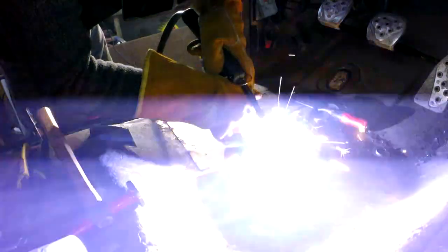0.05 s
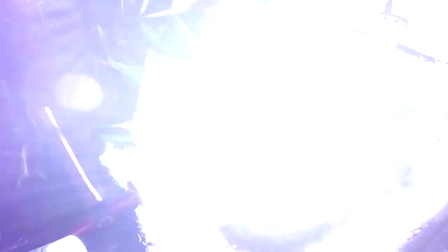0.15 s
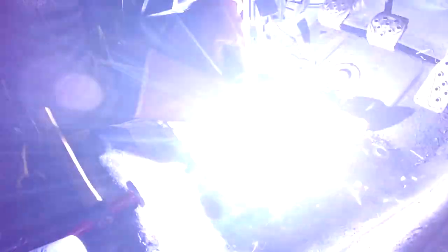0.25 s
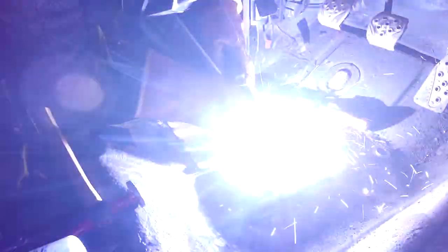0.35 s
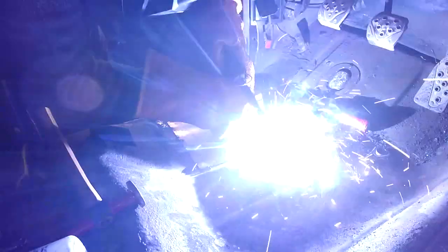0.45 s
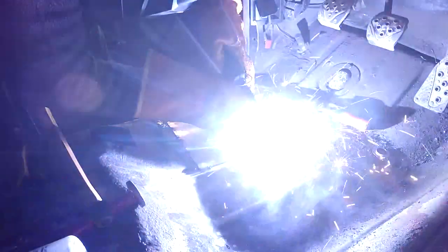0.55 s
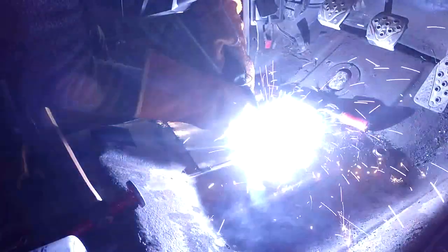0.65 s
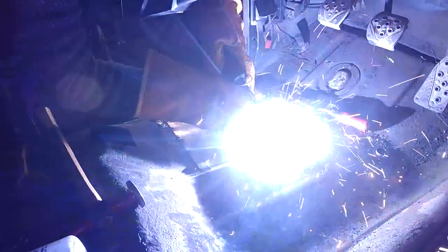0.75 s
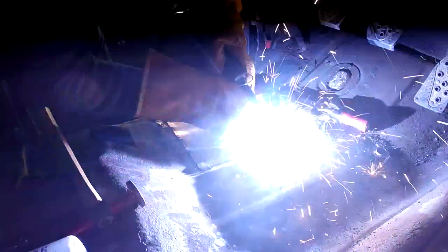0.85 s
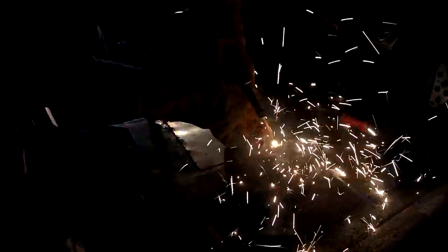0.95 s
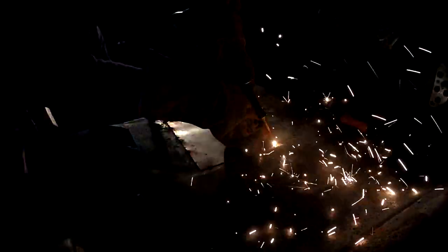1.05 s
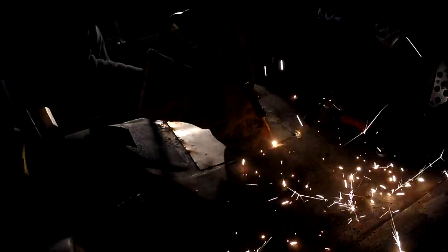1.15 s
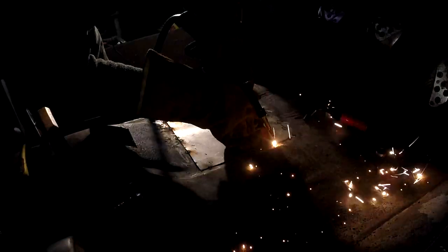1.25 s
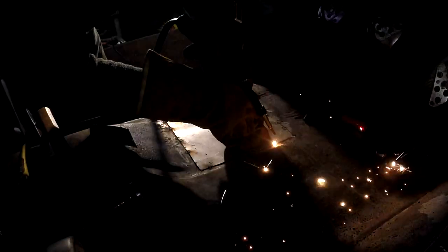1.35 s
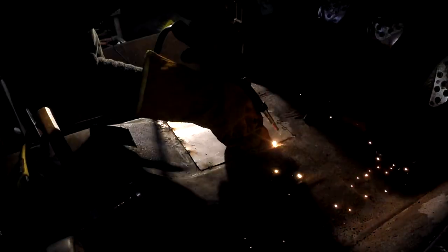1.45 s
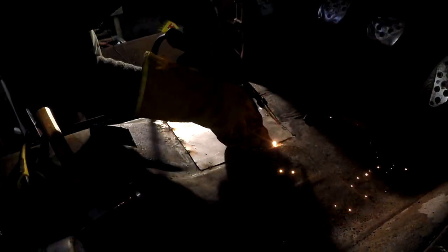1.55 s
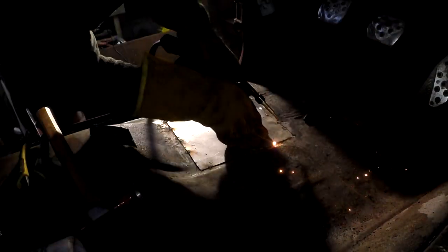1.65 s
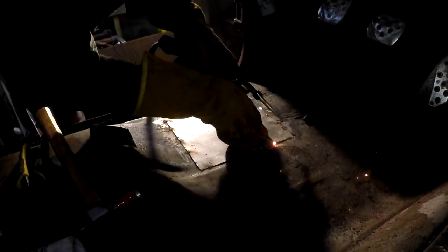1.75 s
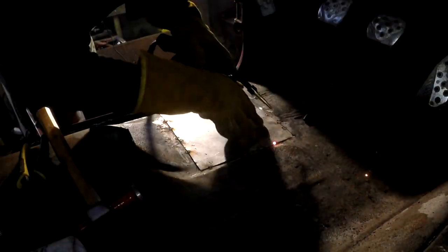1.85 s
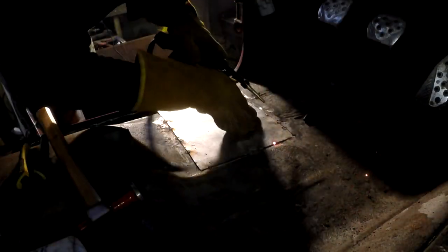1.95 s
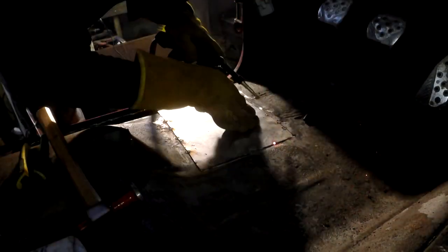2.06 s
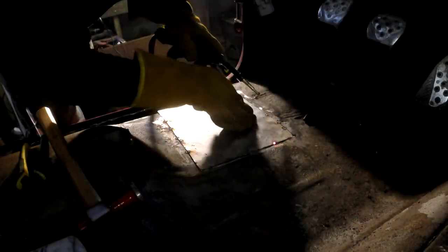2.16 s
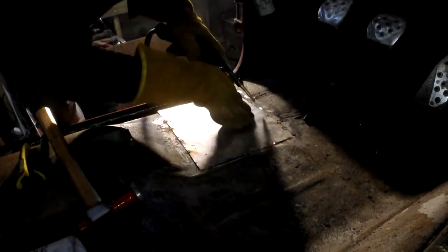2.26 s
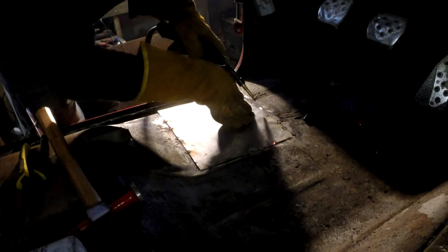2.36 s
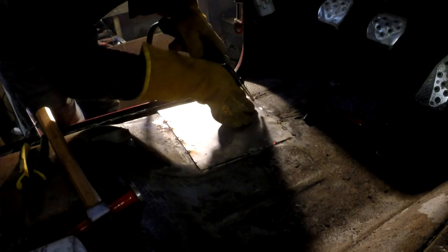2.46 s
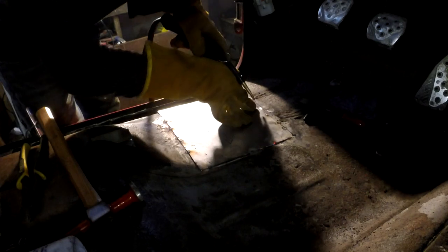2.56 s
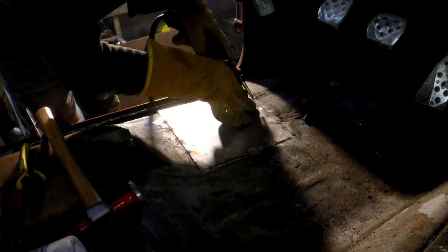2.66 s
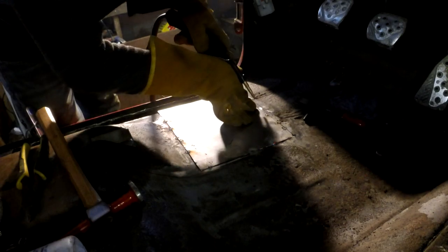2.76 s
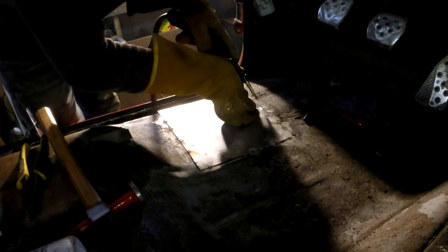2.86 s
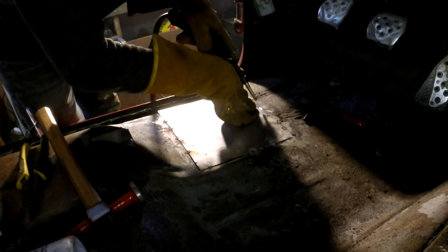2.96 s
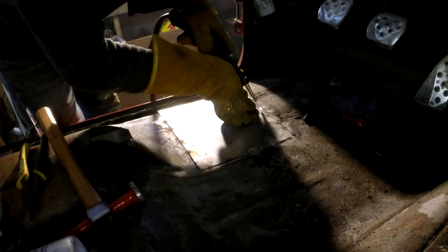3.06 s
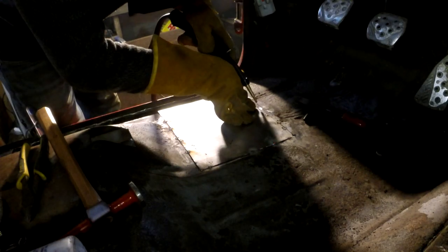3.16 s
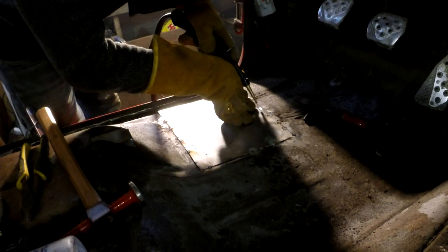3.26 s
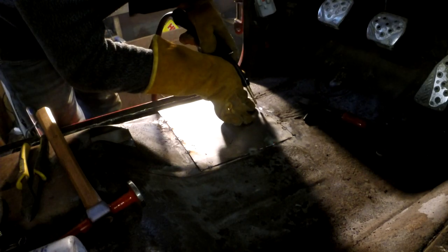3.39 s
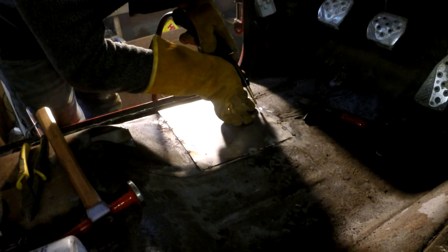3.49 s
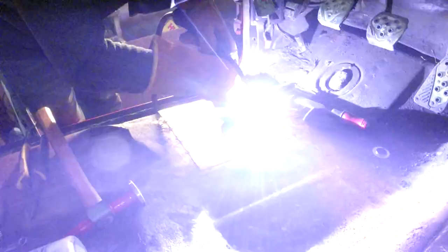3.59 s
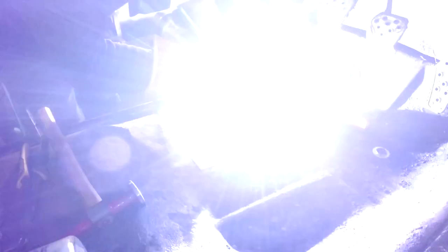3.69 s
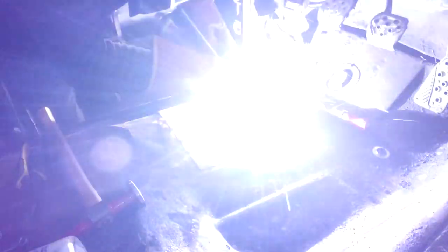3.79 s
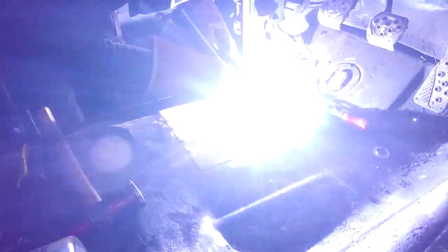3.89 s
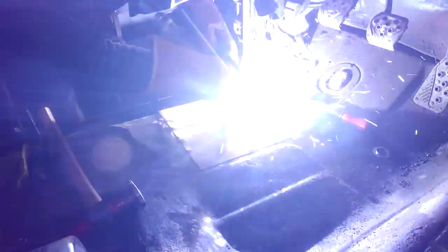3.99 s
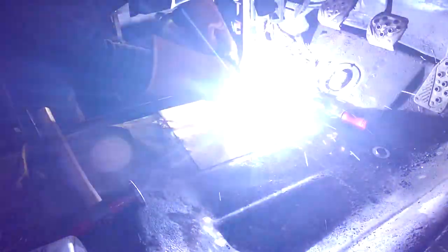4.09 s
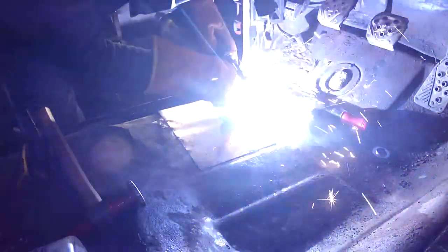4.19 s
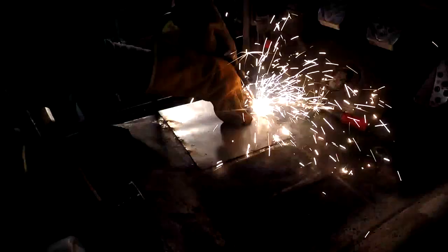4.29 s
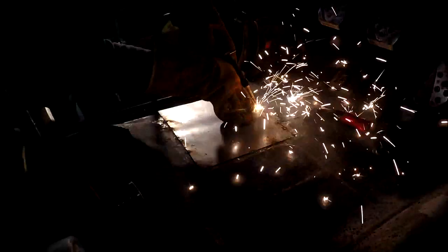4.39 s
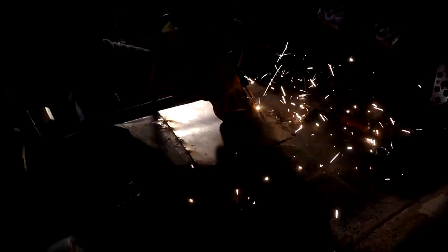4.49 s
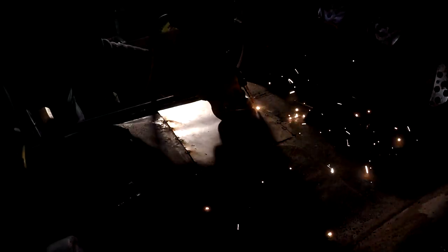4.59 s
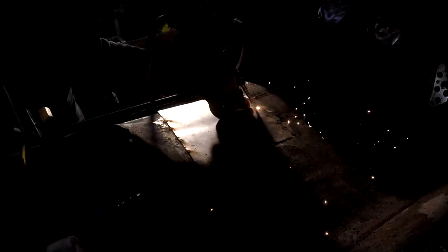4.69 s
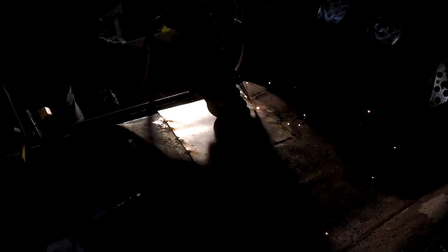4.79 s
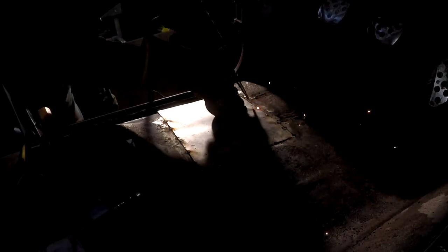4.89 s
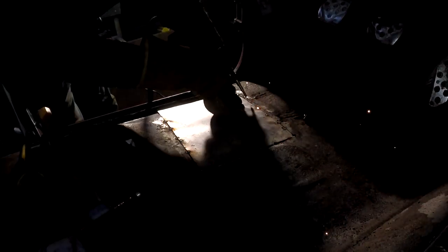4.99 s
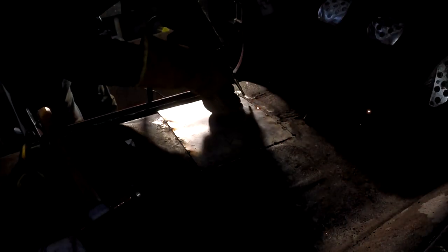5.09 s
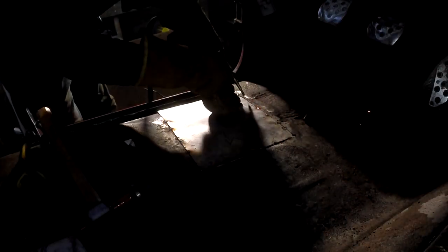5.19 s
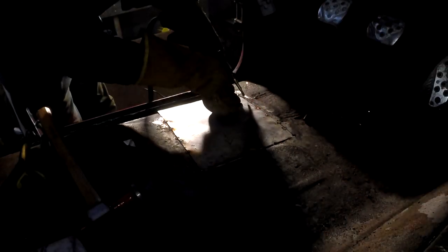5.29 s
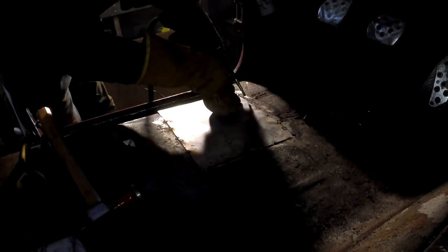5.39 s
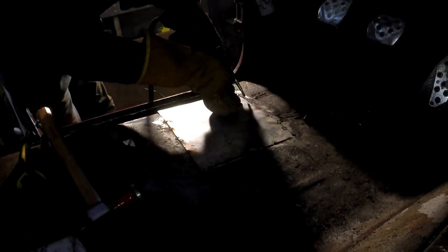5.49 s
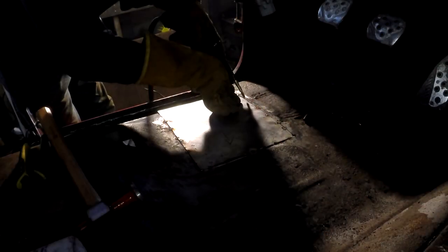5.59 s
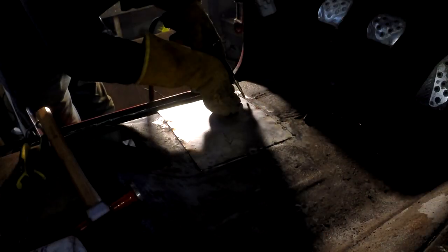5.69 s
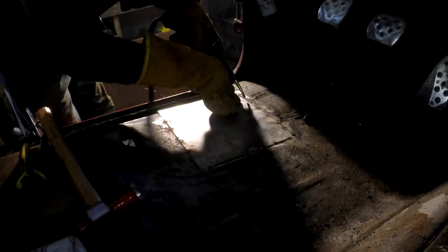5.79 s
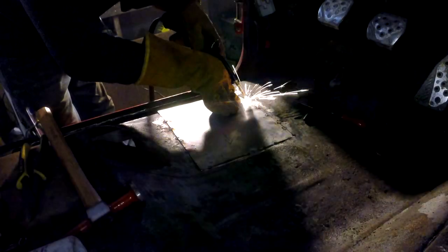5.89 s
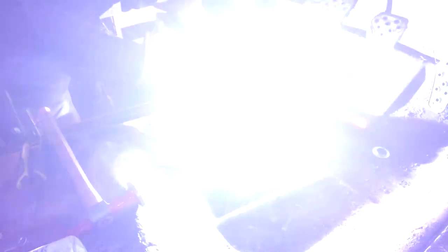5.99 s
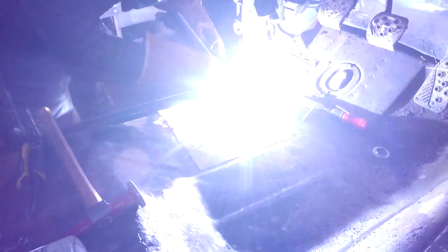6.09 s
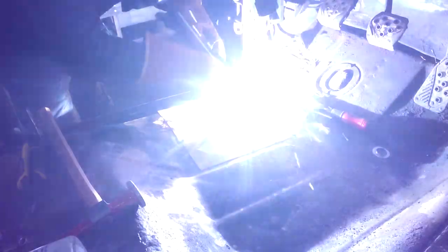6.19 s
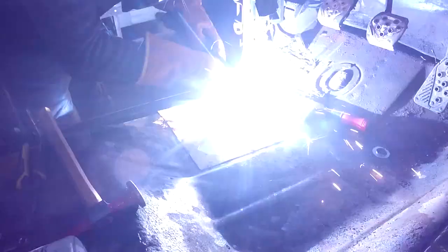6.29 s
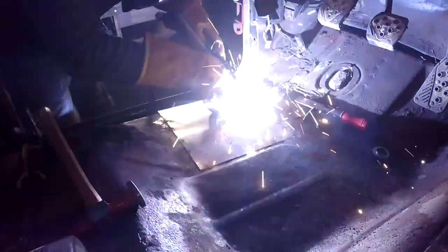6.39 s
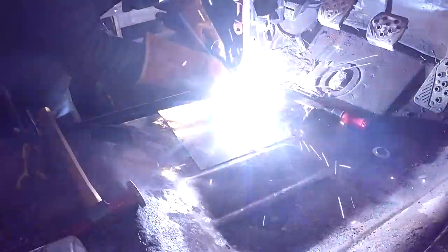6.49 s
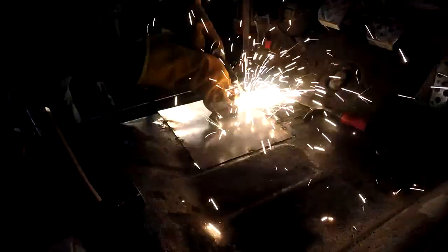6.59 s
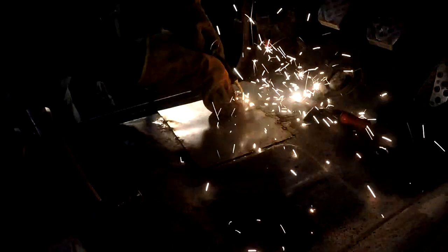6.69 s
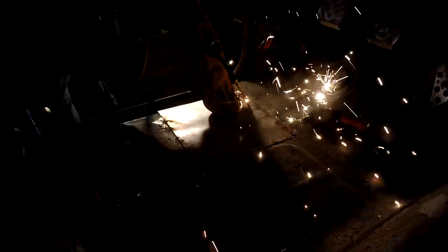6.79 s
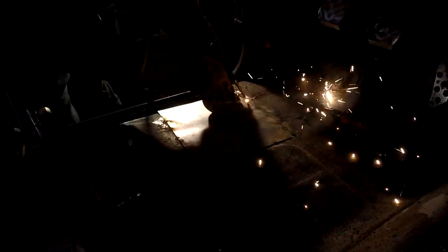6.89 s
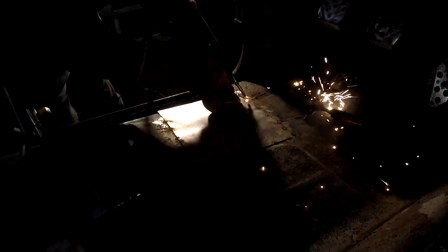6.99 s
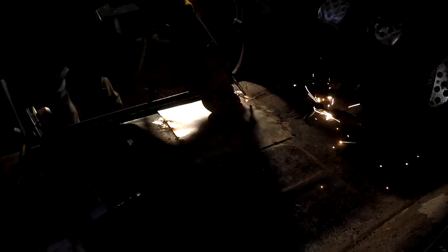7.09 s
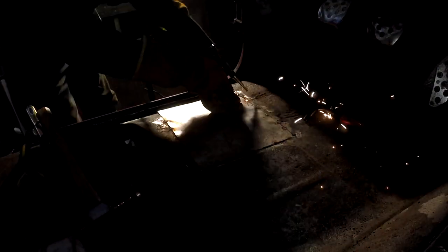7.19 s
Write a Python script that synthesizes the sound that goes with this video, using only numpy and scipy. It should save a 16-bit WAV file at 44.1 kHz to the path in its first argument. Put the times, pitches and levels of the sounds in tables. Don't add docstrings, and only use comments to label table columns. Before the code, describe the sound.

Close, loud and mono: three brief bursts of electric welding, each a ragged string of hard cracks with mains-rate sizzle and a short metallic ring from surrounding panels. A low thud and a tiny gas puff come just before the second and third. The gaps are far quieter, with distant motor hum, airy workshop noise, leather rubbing on steel, muffled torch knocks and a few bright ticks of landing sparks.

```python
import sys
import numpy as np
from scipy import signal
from scipy.fft import rfft, irfft
from scipy.io import wavfile
from scipy.ndimage import uniform_filter1d

SR = 44100
rng = np.random.default_rng(int(sys.argv[2]) if len(sys.argv) > 2 else 0)


def gain_from_db(level_db):
    decades = np.asarray(level_db, float) / 20
    return 10 ** decades


def materialize(psi):
    bounded = np.clip(np.atleast_2d(psi).T, -1, 1)
    quanta = np.round(bounded * 32767).astype(np.int16)
    wavfile.write(sys.argv[1], SR, quanta)


N = 319725
t = np.arange(N) / SR

# start_s, crack_db, shake_db (shake of the hollow)
FIRST_SNAPS = [(.015, -8, -18), (.0348, -4, -11.5), (.0404, -2, 1), (.0548, -12, -6), (.0884, -9, 1),
               (.0909, -3, -7.5), (.1233, -20, -13), (.1719, -9, -8.5), (.2519, -8, -1), (.2555, -9, -2.5),
               (.273, -6, -6), (.2891, -9, -6.5), (.3452, -11, -7), (.4754, -8, -11), (.549, -6, -4),
               (.592, -5, -3), (.6017, -3, -4.5), (.6159, -4, -5.5), (.6228, -11, -6), (.6313, -6, -6),
               (.6553, -9, -7), (.6822, -11, -7.5), (.7317, -8, -8), (.8083, -11, -5), (.8969, -13, -4),
               (.9152, -7, -2.5), (.9243, -16, -3), (.9737, -5, -3), (1.0076, -11, -6.5), (1.0481, -7, -3)]
SECOND_SNAPS = [(3.7795, -4, 0), (3.7906, -2, .5), (3.798, -9, -7), (3.8073, -4, 1), (3.8155, -8, -6),
                (3.8264, -9, -11), (3.8331, -4, -9), (3.8403, -4, -.5), (3.8478, -9, -9), (3.8594, -21, -6),
                (3.8759, -17, -12), (3.8993, -6, -5), (3.9248, -4, -2), (3.9643, -14, -9), (3.9998, -4, -4),
                (4.0356, -6, -4), (4.0483, -13, -9), (4.0678, -14, -11), (4.0761, -13, -6), (4.142, -5, -1),
                (4.1914, -14, -11), (4.2306, -15, -10), (4.319, -5, -3), (4.3327, -9, -10),
                (4.3498, -15, -6), (4.3655, -11, -5), (4.3931, -4, -2), (4.4271, -14, -4.5),
                (4.4335, -5, -2.5), (4.4567, -11, -9)]
THIRD_SNAPS = [(6.0634, -6, -1), (6.1042, -22, -13), (6.1275, 0, 3), (6.2027, -21, -9), (6.2122, -13, -6.5),
               (6.2182, -12, -2), (6.2518, -19, -10), (6.3015, -14, -12), (6.3099, -12, -6),
               (6.3249, -3, -3), (6.3345, -5, -1), (6.343, -7, -5), (6.3606, -16, -5), (6.3664, -9, -14),
               (6.3772, -12, -5.5), (6.4104, -8, -5), (6.427, -11, -5), (6.4666, -7, -6),
               (6.4764, -8, -4.5), (6.5105, -17, -7), (6.5258, -12, -7), (6.5438, -12, -10),
               (6.608, -14, -8), (6.6418, -12, -6), (6.659, -6, -3), (6.6911, -14, -5), (6.7104, -6, -3.5),
               (6.7254, -11, -7), (6.7335, -20, -5), (6.7585, -9, -5.5)]
# time_s, level_db
ARC_STRENGTH = [
    [(0, -19.5), (.07, -34.5), (.14, -68), (.21, -43), (.26, -32), (.40, -33), (.58, -27), (.62, -27),
     (1.09, -33.5)],
    [(3.78, -44), (3.85, -56), (3.89, -24.5), (3.95, -32.5), (4.03, -33.5), (4.08, -33.5), (4.31, -29),
     (4.35, -28), (4.47, -31.5)],
    [(6.065, -47), (6.19, -39.5), (6.24, -29), (6.39, -35), (6.45, -37), (6.49, -27.5), (6.59, -37),
     (6.65, -22.5), (6.77, -38)],
]
# delay_ms, share_of_snap
PLATE_ECHOES = [
    [(.25, .55), (.93, .4), (1.25, .2), (2.0, .4)],
    [(.30, .65), (2.02, .27), (2.52, .25)],
    [(.32, .4), (.98, .3), (1.2, .26), (1.75, .37), (2.38, .25)],
]
RIPPLE_PHASE = [0.26, 1.53, 1.9]
# pitch_hz, width_hz, level_db
FIRST_PANELS = [(552, 63, -7), (931, 410, 4), (1252, 32, -5.0), (1720, 62, -4.0), (2030, 84, -16.0),
                (2427, 18, -5.0), (3010, 250, -38), (3080, 85, 0), (4150, 87, -3.5), (4610, 120, -4.0),
                (5250, 240, -5.5), (6860, 120, -35.5)]
SECOND_PANELS = [(577, 25, -3.0), (830, 15, -5.5), (942, 80, -4.0), (1331.5, 12, -0.5), (1634, 120, -1.0),
                 (2316, 130, 5), (2870, 26, -1.0), (3120, 97, -0.5), (4230, 87, -1.0), (6720, 54, 3.5),
                 (7430, 240, -2)]
THIRD_PANELS = [(574.6, 18, -4.0), (1033, 260, 1.5), (1320, 11, -3.0), (1765, 12, -5.5), (2295, 26, 0.0),
                (2654, 26, -0.5), (3436, 110, 4), (4100, 130, 3.5), (5760, 53, -9), (6290, 60, -3.5),
                (7030, 200, -3)]
# pitch_hz, level_db (per Hz)
HOLLOW_TONE = [(120, -42.5), (200, -2.5), (558, -7.5), (722, -12), (933, -2), (1840, -4), (4040, 1.5),
               (12600, -3.5), (14900, -16), (16000, -36)]
# pitch_hz, fall_s
HOLLOW_FALL = [(200, 0.17), (800, 0.12), (2000, 0.18), (5500, 0.095), (15000, 0.097)]
# start_s, end_s, level_db
TRIGGER_HELD = [
    (-.1, 1.13, -2.5),
    (3.763, 4.505, 0),
    (6.03, 6.776, -8.5),
]
# pitch_hz, level_db
MAINS_TONES = [(60, -55.), (120, -57.), (180, -49.), (240, -53.)]
# pitch_hz, level_db
FAN_TONES = [(91.5, -58), (183.0, -66), (220.7, -66), (258.4, -53.5), (371.4, -66.5), (398.4, -72.5),
             (565.2, -68), (775.2, -66)]
# pitch_hz, level_db (per Hz)
SHOP_AIR = [(18, -46), (30, -24), (98, -14.5), (149, -17.5), (259, -10), (303, -13), (364, -27), (426, -18),
            (702, -17), (1070, -24), (1960, -28), (14400, -55.5), (16000, -68.5)]
# peak_s, peak_db, fade_db_per_s (on both sides)
CLOTH_BUMPS = [(.1, -45, 29), (1.22, -51, 135.5), (1.68, -43, 115), (1.95, -45, 104), (2.53, -53, 48.5),
               (2.99, -44, 110), (3.21, -45, 150), (3.77, -32, 448), (4.08, -52.5, 109), (6.7, -59, 9)]
# start_s, peak_db, pitch_hz
BODY_THUDS = [(.02, -21, 250), (1.75, -37, 148), (2.369, -38, 148), (3.747, -23, 171), (3.83, -31.5, 260.),
              (4.07, -33, 215), (6.067, -34, 140)]
# start_s, peak_db, pitch_hz
TORCH_KNOCKS = [(1.743, -36, 710), (1.941, -30.5, 832), (2.341, -33, 662), (2.424, -29, 598),
                (4.921, -48, 780), (5.152, -28.5, 870), (5.344, -28, 750)]
# start_s, length_s, hiss_db, scrape_db (against hiss), swell_db_per_s
GLOVE_STROKES = [(1.056, .4, -54.5, -1, -13), (1.408, .26, -61, -6, -12), (1.598, 1.7, -71, 14.5, 0),
                 (1.92, 0.32, -55.5, -6, 17), (1.99, 0.22, -59, -14, -3), (2.248, 0.23, -58.5, 0.5, 36),
                 (2.498, 0.18, -57, 1, -10), (2.62, 0.16, -64.5, 6, 0), (4.438, 0.26, -53.5, -8, -30),
                 (4.644, 0.707, -60, 7.5, 6), (4.714, .58, -61, 8.5, 2.5), (5.43, .1, -62, -3, -3),
                 (6.748, 0.17, -49.5, -10, -30), (6.85, .5, -60.5, 0, 0.5)]
# pitch_hz, level_db (per Hz)
GLOVE_HISS = [(880, -46.5), (1500, -23), (2190, -11), (3120, -2), (8740, -13), (10900, -15), (15100, -19),
              (16000, -34)]
# start_s, peak_db
SPARK_TICKS = [(1.2141, -29.5), (1.267, -30), (1.699, -34), (2.7033, -35), (4.6139, -32), (5.4829, -37),
               (6.8494, -43), (6.8773, -30), (6.9994, -36)]
# start_s, length_s, level_db
GAS_PUFFS = [
    (3.741, 0.029, -55),
    (6.029, 0.0255, -53),
]

DROP_SHARE, DROP_LATE_S, DROP_JITTER_S = .75, .001, .0006
DROP_CRACK_DB, DROP_SHAKE_DB, DROP_SCATTER_DB = 12.5, 17, 3
SHORT_S, SHORT_DIP_DB = .013, -4
SHAKE_DB = 0.23
PANEL_DRIFT = .006
SHOP_DB, RUMBLE_DB = -47, -62
STROKE_RISE_S, STROKE_FALL_S = 0.04, 0.061
KNOCK_FADE_DB = .8


def level(x, db):
    return x * gain_from_db(db) / np.sqrt(np.mean(x ** 2))


def colour(x, table):
    hz, db = np.transpose(table)
    f = np.maximum(np.fft.rfftfreq(len(x), 1 / SR), 1)
    gains = gain_from_db(np.interp(np.log(f), np.log(hz), db))
    return irfft(rfft(x) * gains, len(x))


def band(x, lo_hz, hi_hz):
    sos = signal.butter(2, [lo_hz, min(hi_hz, SR / 2.2)], "band", fs=SR, output="sos")
    return signal.sosfilt(sos, x)


def noise():
    return rng.standard_normal(N)


def walk(rate):
    k = int(SR / rate)
    held = np.repeat(rng.standard_normal(N // k + 1), k)
    return 1.32 * uniform_filter1d(uniform_filter1d(held, k), k)[:N]


def train(times, sizes):
    x = np.zeros(N)
    np.add.at(x, (np.asarray(times) * SR).astype(int), sizes)
    return x


def crack(echoes):
    q = (np.arange(40) - 4) / SR
    suction = -np.exp(-(q / 20e-6) ** 2)
    rebound = .15 * np.exp(-((q - 110e-6) / 70e-6) ** 2)
    paths = np.zeros(200)
    paths[0] = 1
    for delay_ms, share in echoes:
        paths[int(delay_ms * SR / 1000)] = share
    heard = band(np.convolve(paths, suction + rebound), 1400, 17000)
    return heard / -heard.min() * gain_from_db(3)


def droplets(arc, ripple_rad, loud_s):
    cycles = np.arange(int(arc[0][0] * 120) + 2, int(arc[-1][0] * 120))
    crest_s = (cycles - ripple_rad / (2 * np.pi)) / 120
    chance = rng.standard_normal((len(crest_s), 3))
    arc_db = np.interp(crest_s, *np.transpose(arc))
    start_s = crest_s + DROP_LATE_S + DROP_JITTER_S * chance[:, 0]
    crack_db = arc_db + DROP_CRACK_DB + DROP_SCATTER_DB * chance[:, 1]
    shake_db = arc_db + DROP_SHAKE_DB + DROP_SCATTER_DB * chance[:, 2]
    shorted = np.any(np.abs(loud_s[:, None] - SHORT_S / 2 - start_s) < SHORT_S / 2, axis=0)
    falls = (rng.random(len(crest_s)) < DROP_SHARE) & ~shorted
    return np.transpose([start_s, crack_db, shake_db])[falls]


def scatter(tilt_db):
    u = np.arange(int(.3 * SR)) / SR
    hz, fall_s = np.transpose(HOLLOW_FALL)
    beyond = gain_from_db(-41.5 - 60 * u / 0.17)
    early = 1 + 2.4 * np.exp(-u / 0.00037)
    out = 0
    for f in 150 * 2 ** np.arange(7):
        t60_s = np.interp(np.log(f * 1.24), np.log(hz), fall_s)
        fall = gain_from_db(-60 * u / t60_s) * early + beyond
        octave = band(rng.standard_normal(len(u)), f, 2 * f) * fall
        out = out + octave / np.sqrt(t60_s) * gain_from_db(tilt_db * np.log2(f / 2000))
    build_up = np.clip(u / 0.0014, 0, 1)
    fade_out = np.clip(10 * (1 - u / u[-1]), 0, 1)
    out = colour(out, HOLLOW_TONE) * build_up * fade_out
    return out / np.sqrt(np.sum(out ** 2))


def hollow(ring, ring_db):
    u = np.arange(int(.1 * SR)) / SR
    hz, width, db = np.transpose(ring)[:, :, None]
    hz = hz * (1 + PANEL_DRIFT * rng.standard_normal(hz.shape))
    start = rng.uniform(0, 2 * np.pi, hz.shape)
    swell = np.clip(u / 0.00051, 0, 1) * np.exp(-np.pi * width * u)
    strength = gain_from_db(db + ring_db) * np.sqrt(width / SR)
    return np.sum(strength * swell * np.sin(2 * np.pi * hz * u + start), axis=0)


def arc_sizzle(snaps, arc, ripple_rad):
    ripple = np.exp(1.5 * np.cos(2 * np.pi * 120 * t + ripple_rad))
    crackle = noise() * gain_from_db(2 * rng.exponential(size=N)) * (rng.random(N) < .15)
    arc_s, arc_db = np.transpose(arc)
    strength = gain_from_db(np.interp(t, arc_s, arc_db, left=-150, right=-150))
    sizzle = level(crackle * ripple * gain_from_db(2 * walk(60)), -11.5) * strength
    shorted = np.zeros(N, bool)
    for start_s, crack_db, _ in snaps:
        if crack_db > -9.5:
            shorted |= (t > start_s - SHORT_S) & (t < start_s)
    return sizzle * gain_from_db(SHORT_DIP_DB * shorted)


def weld(snaps, arc, echoes, panels, ripple_rad, tail_db):
    small = droplets(arc, ripple_rad, np.array(snaps)[:, 0])
    start_s, crack_db, shake_db = np.vstack([snaps, small]).T
    sizzle = arc_sizzle(snaps, arc, ripple_rad)
    shake = train(start_s, gain_from_db(shake_db + SHAKE_DB)) + sizzle
    direct = np.roll(train(start_s, gain_from_db(crack_db)), -4) + sizzle / 2
    paths = [(direct, crack(echoes))]
    paths.append((shake, gain_from_db(tail_db - 2) * scatter(tilt_db=1)))
    spot = np.repeat(rng.integers(7, size=N // 200 + 1), 200)[:N]
    for k in range(7):
        answer = gain_from_db(tail_db) * scatter(tilt_db=-1.58)[:4410] + hollow(*panels)
        paths.append((shake * (spot == k), answer))
    span = slice(max(int(start_s.min() * SR) - 600, 0), int(start_s.max() * SR) + SR // 2)
    out = np.zeros(N)
    for source, answer in paths:
        out[span] += signal.fftconvolve(source[span], answer)[:len(out[span])]
    return out


def transformer():
    held = sum(gain_from_db(db) * ((t > on) & (t < off)) for on, off, db in TRIGGER_HELD)
    tones = 0
    for hz, db in MAINS_TONES:
        tones = tones + gain_from_db(db + 2 + 3.5 * walk(15)) * np.sin(2 * np.pi * hz * t + hz)
    return gain_from_db(2.2) * uniform_filter1d(held, 900) * tones


def fan():
    turns = 2 * np.pi * np.cumsum(1 + .003 * walk(3)) / SR
    tones = sum(gain_from_db(db + 4.5 + walk(12)) * np.sin(hz * turns) for hz, db in FAN_TONES)
    air = level(colour(noise(), SHOP_AIR), SHOP_DB - 2.5)
    return tones + air * gain_from_db(0.27 * walk(8.9))


def microphone_rumble():
    cloth = gain_from_db(RUMBLE_DB)
    for peak_s, db, fade in CLOTH_BUMPS:
        cloth = cloth + gain_from_db(db - fade * np.abs(t - peak_s))
    return cloth * level(band(noise(), 30, 98), -1.7)


def thuds_and_knocks():
    out = np.zeros(N)
    for start_s, db, hz in [*BODY_THUDS, *TORCH_KNOCKS]:
        since = np.maximum(t - start_s, 0)
        fade = gain_from_db(db - since * hz * KNOCK_FADE_DB) * (t > start_s)
        out += fade * level(band(noise(), 0.6 * hz, 1.22 * hz), -9.5)
    return out


def stroke(start_s, length_s, swell_db):
    rise = np.clip((t - start_s) / STROKE_RISE_S, 0, 1)
    fall = np.clip((start_s + length_s - t) / STROKE_FALL_S, 0, 1)
    return (rise * fall) ** 2 * gain_from_db(swell_db * np.clip(t - start_s, 0, length_s))


def brushing():
    grit = noise() * gain_from_db(2.9 * np.minimum(rng.exponential(size=N), 6))
    hiss = level(colour(grit, GLOVE_HISS), 0.12) * gain_from_db(2.0 * walk(30))
    scrape = level(band(noise(), 350, 1540), -1.9) * gain_from_db(1.0 * walk(40))
    out = np.zeros(N)
    for start_s, length_s, db, scrape_db, swell in GLOVE_STROKES:
        out += gain_from_db(db) * stroke(start_s, length_s, swell) * (hiss + gain_from_db(scrape_db) * scrape)
    return out


def spark_ticks():
    start_s, db = np.transpose(SPARK_TICKS)
    ticks = signal.fftconvolve(train(start_s, gain_from_db(db + 6.0)), scatter(tilt_db=-2.0))[:N]
    return band(ticks, 3500, 16500)


def gas_valve():
    is_open = sum(gain_from_db(db) * ((t > s) & (t < s + length_s)) for s, length_s, db in GAS_PUFFS)
    return uniform_filter1d(is_open, 150) * level(band(noise(), 4100, 13000), 0)


def scene():
    snaps = (FIRST_SNAPS, SECOND_SNAPS, THIRD_SNAPS)
    panels = [(FIRST_PANELS, 8), (SECOND_PANELS, 4), (THIRD_PANELS, 7)]  # ring, level_db
    spots = zip(snaps, ARC_STRENGTH, PLATE_ECHOES, panels, RIPPLE_PHASE)
    welds = sum(weld(*spot, tail_db=4.5) for spot in spots)
    steady = transformer() + fan() + microphone_rumble()
    handling = thuds_and_knocks() + brushing() + spark_ticks() + gas_valve()
    return (welds + steady + handling)[None]


def top_cut(x):
    return signal.sosfilt(signal.butter(12, 16470, fs=SR, output="sos"), x)


def record(dry):
    low_pass = signal.ellip(6, .1, 12, 15400, fs=SR, output="sos")
    mix = np.tanh(signal.sosfiltfilt(low_pass, dry) * 0.56) / 0.68
    return top_cut(mix)


dry = scene()
out = record(dry)
materialize(out)
```